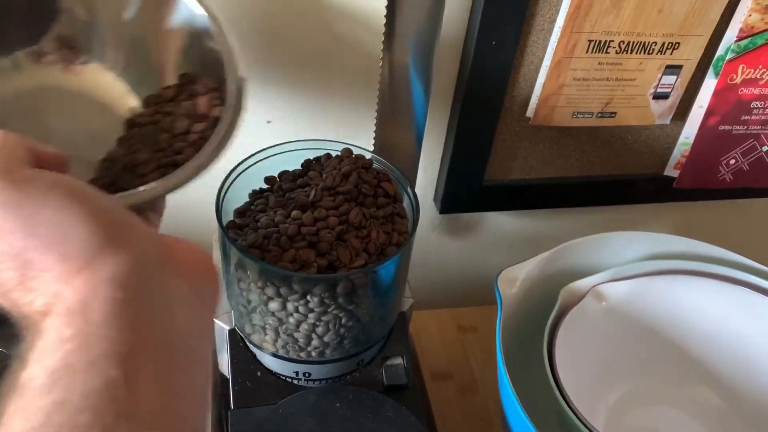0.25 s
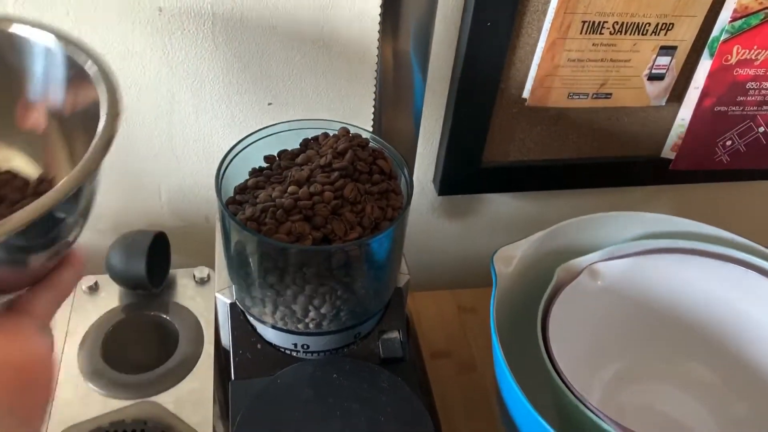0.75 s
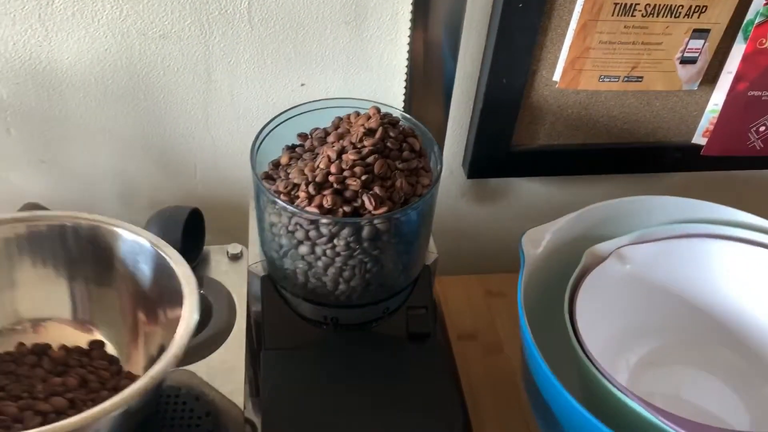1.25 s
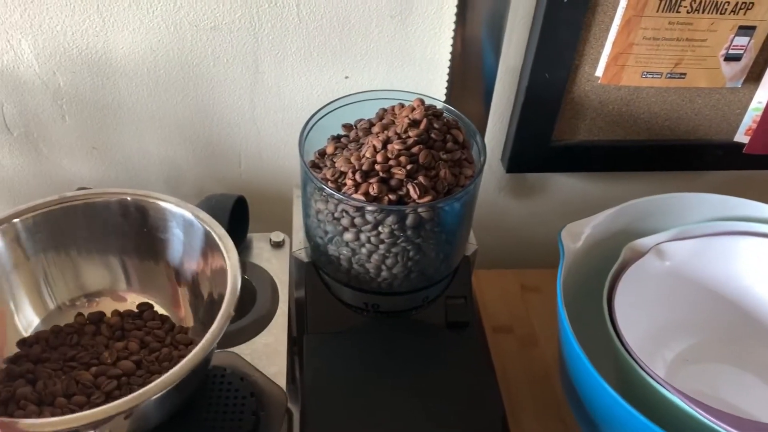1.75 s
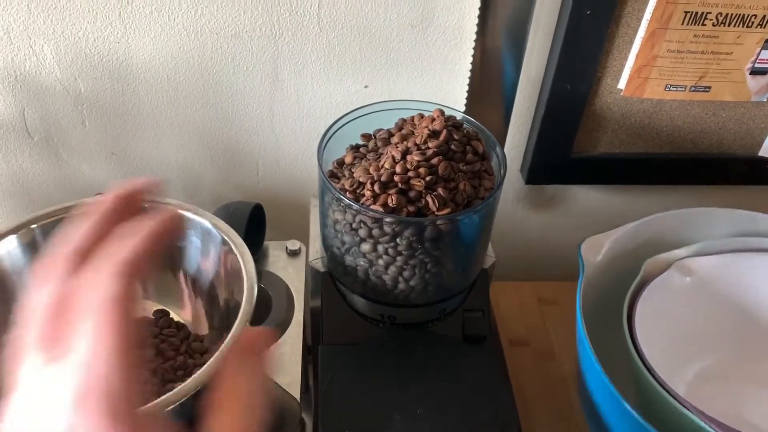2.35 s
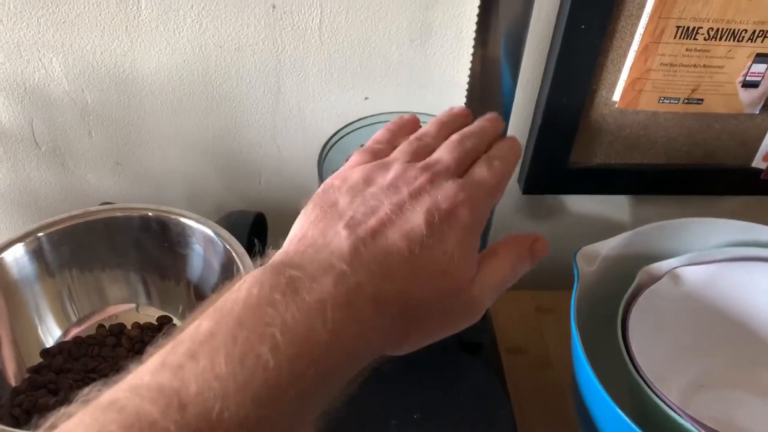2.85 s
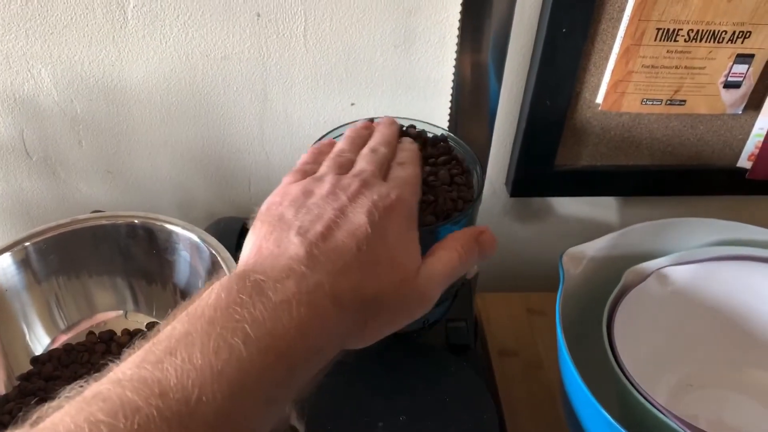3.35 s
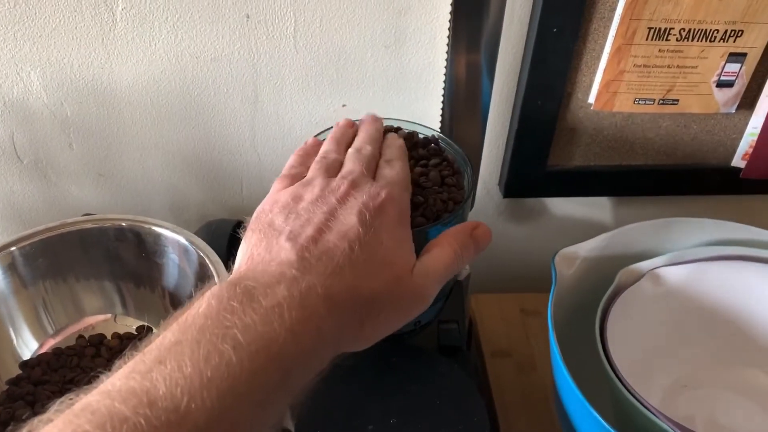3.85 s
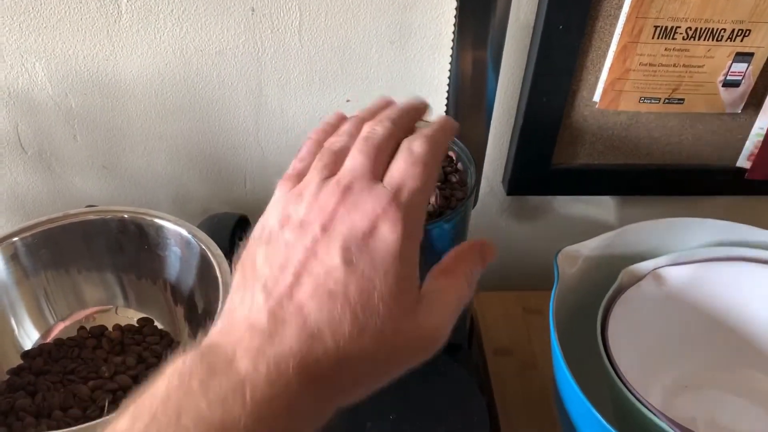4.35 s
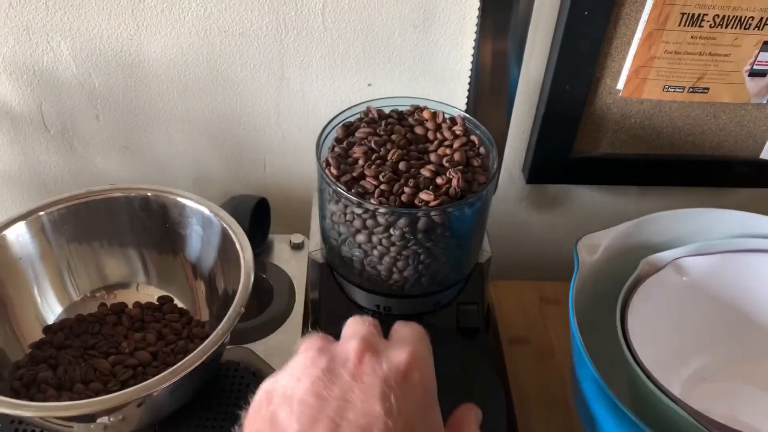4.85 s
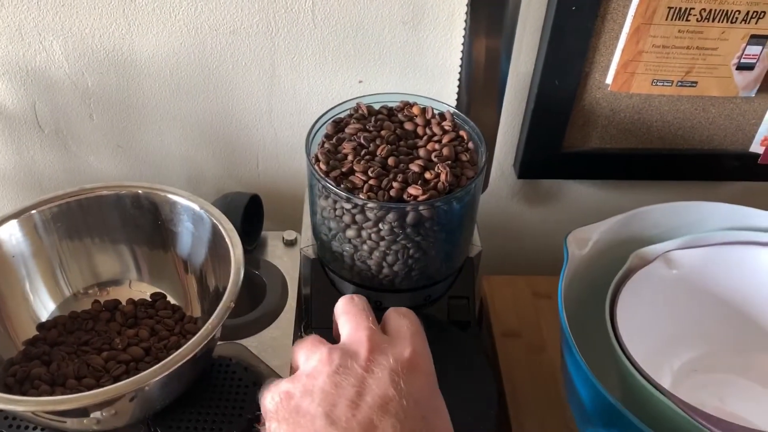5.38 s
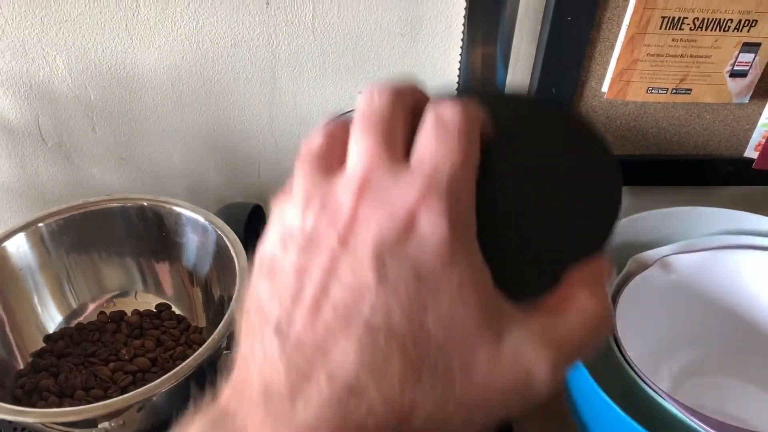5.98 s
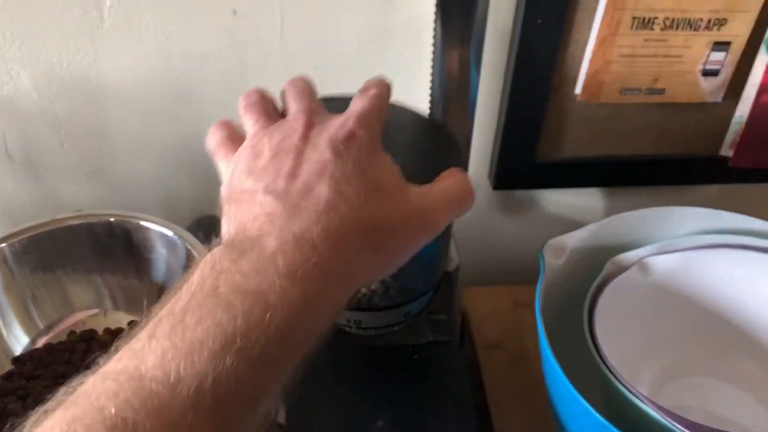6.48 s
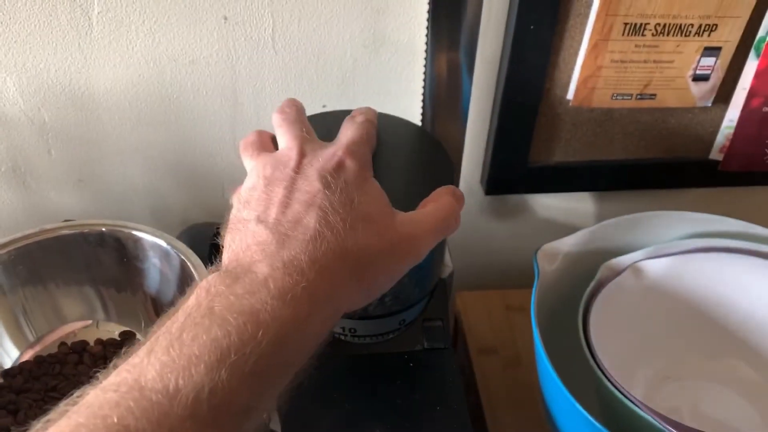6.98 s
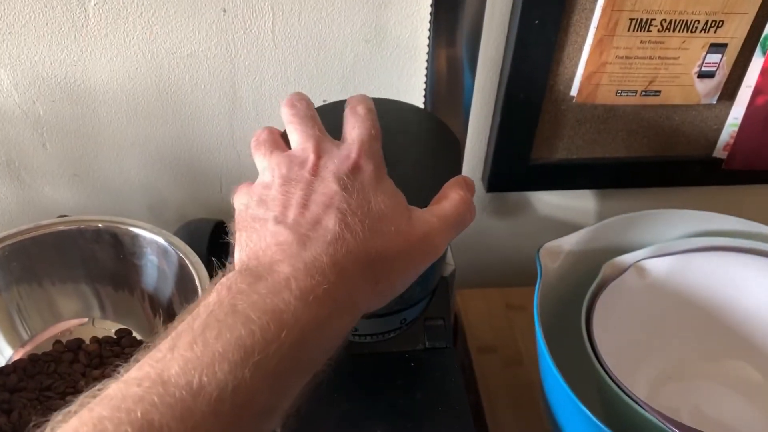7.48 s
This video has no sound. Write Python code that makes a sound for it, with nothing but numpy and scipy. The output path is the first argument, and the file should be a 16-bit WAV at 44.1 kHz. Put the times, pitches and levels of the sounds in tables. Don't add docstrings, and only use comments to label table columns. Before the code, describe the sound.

Close stereo phone microphones catch a bright, dry burst of beans in thin metal, then a loud bowl landing with two bumps. Quiet follows, with low floorboard thumps and distant appliance hum. Beans crunch and tick as they are levelled in a hollow plastic container. Near the end a lid knocks, beans click beneath it, and it seats with a firm closing clack in the small, slightly live kitchen.

```python
import sys
import numpy as np
from scipy import signal
from scipy.fft import rfft, irfft, next_fast_len
from scipy.io import wavfile
from scipy.ndimage import uniform_filter1d

SR = 44100
rng = np.random.default_rng(int(sys.argv[2]) if len(sys.argv) > 2 else 0)


def wav_out(sig):
    wavfile.write(sys.argv[1], SR, np.round(np.clip(np.atleast_2d(sig).T, -1, 1) * 32767).astype(np.int16))


def voltage_ratio(decibels):
    exponent = np.asarray(decibels, float) / 20
    return 10 ** exponent


N = 340447

# peak in seconds, rattle in dB, swell in seconds, settle in seconds.
BOWL_SHIFTS = [
    (0.0, -48.5, 0.0073, 0.048),
    (.03, -72, .01, 0.042),
    (.165, -58.5, 0.014, 0.13),
    (.225, -46.5, .015, 0.041),
    (.89, -71.5, 0.035, 0.13),
    (.97, -68, 0.015, 0.75),
    (1.229, -35, .004, 0.12),
    (1.218, -50, .01, 0.0492),
    (1.275, -36.5, 0.068, 0.043),
    (1.388, -56, 0.011, 0.29),
]
# time in seconds, rattle in dB.
POUR = [(0.049, -69), (.15, -67.5), (.21, -54), (.264, -50), (.33, -45), (.4, -38), (.47, -41), (.53, -53),
        (0.584, -62), (.635, -76)]
# start in seconds, peak in dB, brightness in dB.
BOWL_CLICKS = [(.0074, -37.5, -15), (0.0269, -37, -1.5), (0.072, -55, 2), (0.163, -35.5, 2.5),
               (0.218, -31.5, -4.5), (0.2246, -31.5, 0), (0.2286, -34.5, -3.5), (0.261, -36.5, -6),
               (.272, -34.5, -6), (0.2774, -35, -6), (.2845, -32.5, -3), (0.2954, -22, -1.5),
               (.3015, -31, -2.5), (.327, -31, -3), (.3452, -31, -2.5), (0.3473, -23.5, -2.5),
               (0.361, -31, -3), (.367, -28, -4), (.371, -26.5, -4), (0.382, -28, -3.5),
               (0.3887, -15.5, -2.5), (0.396, -20.5, -4), (0.3985, -24.5, -8), (.413, -22, -4.5),
               (0.409, -21.5, 0), (0.4166, -19, -1), (0.437, -19.5, -1), (0.4603, -15.5, -1),
               (0.47, -24, -1.5), (0.4844, -19, -3), (0.4884, -23.5, -0.5), (0.499, -26.5, -4.5),
               (0.504, -24, -5.5), (.5455, -38, -1.5), (.5695, -34, 0), (.585, -39, -0.5),
               (0.5555, -30.5, -3), (0.5646, -32.5, 2.5), (0.5814, -36.5, 0), (0.889, -59, -1.5),
               (0.9715, -49, -12), (1.2267, -13.5, -3), (1.235, -9.5, -1.5), (1.271, -17.5, -2.5),
               (1.387, -24.5, -3.5)]
# mode in Hz, width in Hz, level in dB.
HELD_WALL = [(3120, 100, 2), (3130, 150, -5), (3640, 120, -8), (4424, 220, -17.5), (8200, 300, 1.5),
             (9590, 66, -4), (10100, 73, -0.5), (10680, 70, -7), (11020, 2000, 5.5), (11350, 59, -6.5),
             (13780, 67, -4.5), (13400, 250, -3), (14200, 300, -4)]
# time in seconds, gain in dB.
HEAP_GAIN = [(.16, 2), (.29, 7), (.42, 2.5), (.5, -4.5), (.6, -1.5)]
# mode in Hz, width in Hz, level in dB.
RESTING_WALL = [(4440, 90, -7.5), (6473, 53, -8), (7560, 120, -3.5), (8040, 69, -2), (9400, 73, -6.5),
                (9750, 42.4, -4), (11000, 39, -7)]


def bowl_beans():
    lands_s = 1.2
    beans = clicks(BOWL_CLICKS)
    t = np.arange(N) / SR
    rush = voltage_ratio(np.interp(t, *np.transpose(POUR), left=-200, right=-200))
    sliding = np.hypot(swells(BOWL_SHIFTS), rush)
    booming = voltage_ratio(-2.5) * sliding ** 1.193 * (t < lands_s)
    slide, body = rattle(sliding, booming, 2 * SR, per_s=2500, spread_db=2.4)
    struck = beans[:, :SR] + slide[:, :SR]
    add(beans, 0, slide + body)
    add(beans, 1, wall(beans[:, SR:2 * SR], RESTING_WALL, -15, damped=3))
    loaded = voltage_ratio(np.interp(t[:SR], *np.transpose(HEAP_GAIN)))
    add(beans, 0, wall(struck * loaded, HELD_WALL[:3], -13))
    add(beans, 0, wall(struck, HELD_WALL[3:], -10))
    return beans


# peak in seconds, rattle in dB, swell in seconds, settle in seconds.
HOPPER_SHIFTS = [(2.906, -63, 0.012, 0.35), (3.15, -57, 0.022, 0.4), (3.22, -54, 0.19, 0.27),
                 (3.07, -70, .15, 0.42), (3.264, -33.5, 0.015, 0.031), (3.29, -39.5, 0.082, 0.15),
                 (3.4, -54, .2, 0.035), (3.52, -84, 0.017, 0.053), (3.688, -54, 0.032, 0.045),
                 (3.766, -71.5, 0.031, 0.057), (3.815, -78, 0.027, 0.026), (3.928, -66, 0.038, 0.075),
                 (4.98, -60, 0.066, 0.074), (6.468, -64, 0.0073, 0.046), (6.488, -36, 0.02, 0.065),
                 (6.705, -59.5, 0.015, 0.2), (6.764, -51, 0.084, 0.038), (6.8, -70, .03, 0.12),
                 (6.882, -46, 0.0063, 0.11), (6.906, -32.5, 0.026, 0.0067), (6.93, -61, .04, 0.13),
                 (7.09, -78.5, 0.091, 0.23), (7.265, -83, 0.23, .02), (7.285, -71, 0.011, 0.092),
                 (7.355, -73, .1, 0.013), (7.01, -60, 0.0081, 0.024), (7.335, -58, 0.13, 0.02),
                 (7.492, -28, 0.014, 0.0084), (7.53, -50.5, 0.046, 0.099), (7.466, -60, .01, 0.056)]
# start in seconds, peak in dB, brightness in dB.
HOPPER_CLICKS = [(2.9065, -60, -8), (2.9094, -60, -7), (3.0837, -50.5, -8), (3.111, -44, -3.5),
                 (3.2212, -36.5, -1), (3.1481, -30.5, -1), (3.2605, -36.5, 3), (3.2638, -15, 0.5),
                 (3.268, -29.5, -3), (3.2825, -27, 0), (3.288, -37.5, -8), (3.3145, -37, -2.5),
                 (3.2995, -23, 0), (3.325, -22.5, -0.5), (3.339, -28.5, -0.5), (3.3812, -30, -8),
                 (3.4078, -28.5, 1), (3.51, -53, -15), (3.524, -53, -9), (3.6531, -54, -6),
                 (3.668, -46.5, -4), (3.8092, -58, 6), (3.689, -29, -2), (3.769, -44, -15),
                 (3.9297, -51.5, -12), (4.954, -50, 2.5), (4.9786, -52, -19), (6.468, -36, -3),
                 (6.4755, -24, -0.5), (6.479, -29, -2), (6.4875, -27, -2.5), (6.4907, -32, -4),
                 (6.754, -28, -2), (6.763, -32, -26), (6.8838, -27.5, -2), (6.889, -29, -2),
                 (6.902, -16, 2), (7.009, -54, 5), (7.232, -47, -2.5), (7.281, -44.5, -8), (7.353, -55, 0),
                 (7.306, -39, -5), (7.471, -43.5, -0.5), (7.4801, -14.5, -0.5), (7.494, -11, -3.5)]
# mode in Hz, width in Hz, level in dB.
OPEN_WALL = [(4014, 80, -10), (5360, 270, -3), (6670, 45, -12.5), (8080, 57, -17), (9580, 90, 2.5),
             (11250, 110, -0.5), (12780, 180, -6)]
# mode in Hz, width in Hz, level in dB.
LIDDED_WALL = [(2420, 24, -12.5), (3674, 27, -8), (4530, 38, -8.5), (6220, 190, -18), (6900, 420, -0.5),
               (9400, 52, -16), (9780, 99, 0.5), (13380, 360, -11.5)]


def hopper_beans():
    lid_on_s = 4.5
    lid_on = round(lid_on_s * SR)
    stirred = swells(HOPPER_SHIFTS)
    drumming = voltage_ratio(-40) * stirred ** 0.51 * (stirred > voltage_ratio(-88))
    grains, body = rattle(stirred, drumming, N, per_s=2000, spread_db=2.6)
    beans = clicks(HOPPER_CLICKS) + grains + body
    add(beans, 2, wall(beans[:, 2 * SR:lid_on], OPEN_WALL, -15, damped=2.5))
    add(beans, lid_on_s, wall(beans[:, lid_on:], LIDDED_WALL, -14, damped=2.5))
    return beans


# frequency in Hz, density in dB per Hz.
BEAN = [(1470, -38), (2500, -15), (2950, -17), (3420, 0), (3790, -10.5), (4030, -5), (4430, -4), (6070, -3),
        (8770, -6.5), (9120, -2.5), (9640, -4.5), (11900, -12), (13100, -5.5), (14400, -18), (14950, -34),
        (15600, -22), (16000, -23.5), (16400, -44.5)]
# frequency in Hz, density in dB per Hz.
HOLLOW = [(350, -82), (600, -17), (705, -17.5), (1190, -18), (1420, -21), (1690, -17), (2040, -17),
          (3200, -29.5), (4160, -43.5), (7040, -120)]


def rattle(level, hollow, length, per_s, spread_db):
    ring_s = 0.0012
    size = voltage_ratio(spread_db * np.minimum(rng.exponential(1, length), 4))
    hits = size * (rng.random(length) < per_s / SR)
    bursts = np.sqrt(signal.lfilter([1], [1, -np.exp(-2 / (ring_s * SR))], hits ** 2))
    grains = evened(bursts * rng.standard_normal((2, length)))
    scratch = colour(grains * voltage_ratio(-4) * level[:length], BEAN)
    return scratch, colour(grains[::-1] * hollow[:length], HOLLOW)


def clicks(table):
    contact_s, rebound, chatter, chatter_db = 0.0006, 4, 20, -15
    t = np.arange(2000) / SR
    u = t / contact_s
    shape = (1 - np.exp(-u)) * (2 * np.exp(-u / rebound) + voltage_ratio(chatter_db) * np.exp(-u / chatter))
    dull, bright = np.zeros((2, 2, N))
    for s, db, bright_db in table:
        noise = rng.standard_normal((3, len(t)))
        uneven = voltage_ratio(2.5 * evened(uniform_filter1d(noise[2], size=30)))
        hz = rng.uniform(6000, 14000, (4, 1))
        rings = voltage_ratio(-13) * np.sin(2 * np.pi * hz * t).sum(0)
        burst = shape * (uneven * noise[:2] + rings)
        onset = burst[:, :len(t) // 16]
        burst = voltage_ratio(db + 2) * burst / np.sqrt(np.mean(onset ** 2))
        share = np.clip(voltage_ratio(bright_db), 0.05, 0.97)
        add(bright, s, share * burst)
        add(dull, s, np.sqrt(1 - share ** 2) * burst)
    return voltage_ratio(-12.5) * colour(band(dull, 900, 9900) + band(bright, 8600, 16000), BEAN)


def wall(struck, modes, db, damped=1):
    return voltage_ratio(db) * sum(voltage_ratio(mode_db) * resonate(struck, hz, damped * width) for hz, width, mode_db in modes)


def shifting(x):
    patchy_db = 2.6
    z = signal.stft(x, nperseg=256)[2]
    patches = uniform_filter1d(rng.standard_normal(z.shape[1:]), size=4, axis=0)
    patches = evened(uniform_filter1d(patches, size=10, axis=1))
    return signal.istft(z * voltage_ratio(patchy_db * patches - 0.16 * patchy_db ** 2), nperseg=256)[1][:, :N]


# start in seconds, peak in dB, pitch in Hz, t60 in seconds.
PINGS = [
    (0.218, -39, 3250, 0.04),
    (3.264, -47, 4000, 0.14),
    (5.408, -62, 3380, 0.06),
    (7.191, -70, 3685, 0.075),
    (7.19, -65, 4510, 0.069),
]


def pings():
    t, out = np.arange(6000) / SR, np.zeros((2, N))
    for s, db, hz, t60 in PINGS:
        ring = voltage_ratio(db - 60 * t / t60) * np.sin(2 * np.pi * hz * t) * (1 - np.exp(-t / 0.0011))
        add(out, s, ring * sides(0))
    return out


# start in seconds, low peak in dB, middle and top in dB relative to it.
BOWL_KNOCKS = [
    (1.2273, -26, -9.5, -11.5),
    (1.2306, -22.5, -12, -15),
    (1.236, -38, -3, 1),
    (1.269, -27, -10.5, -5.5),
    (1.282, -33, -22, -19),
    (1.389, -27, -16.5, -10),
    (1.395, -29.5, -25, -23.5),
    (1.419, -35.5, -11, -17.5),
]
# mode in Hz, level in dB, t60 in seconds.
BOWL = [(193, -5.5, 0.073), (279.4, -2.5, 0.07), (365.4, 4.5, 0.053), (456, 0, 0.046), (518, -9, 0.058),
        (633.6, -7.5, 0.089), (759, -13.5, 0.058), (839.5, -11.5, 0.069), (1131, -16.5, .05),
        (1702, -17.5, 0.036), (2380, -13.5, .04)]


def bowl_knocks():
    rows = [(*row, 1) for row in BOWL_KNOCKS]
    return knocks(rows, BOWL, contact_s=0.0037, push_s=0.0015, clatter_s=0.086)


# start in seconds, low peak in dB, middle and top in dB relative to it, pitch ratio.
LID_KNOCKS = [(4.96, -52.5, 1.5, 0.5, 0.75), (4.979, -41, 3, -20, 0.92), (5.249, -51, -3.5, -7, 1.4),
              (5.408, -48.5, -10, -12, 1.73), (5.701, -43, -23, -36, 0.55), (6.478, -42.5, -5, 2.5, 1.23),
              (6.4915, -31, 5.5, -8, 1.58), (6.504, -31.5, -8.5, -25, 1.15), (6.752, -43, -19, -26, 0.71),
              (6.787, -45, -12.5, -25, 1.53), (6.884, -40.5, -7, -28, 1.08), (6.9015, -29, -19, -37, 1.47),
              (6.905, -36, -21, -38, 0.91), (7.042, -51, 2, -24, 0.897), (7.233, -41.5, -19, -32, 1.35),
              (7.305, -41.5, -24, -13, 1.38), (7.351, -43, -19, -24, 0.96), (7.466, -36, -14, -17, 1.13),
              (7.484, -29, -1, -7, 1.14), (7.49, -18.5, -21, -7, 1.02)]
# mode in Hz, level in dB, t60 in seconds.
LID = [(130.4, -7.5, 0.082), (285, 5.5, 0.045), (448, -13.5, 0.096)]


def lid_knocks():
    return knocks(LID_KNOCKS, LID, contact_s=0.0016, push_s=0.00173, clatter_s=0.05)


def knocks(table, modes, contact_s, push_s, clatter_s):
    t, (out, middle, top) = np.arange(6000) / SR, np.zeros((3, 2, N))
    hz, db, t60 = np.transpose(modes)[:, :, None]
    touch = 1 - np.exp(-t / contact_s)
    push = (1 - np.exp(-t / push_s)) ** 2
    for s, low_db, middle_db, top_db, pitch in table:
        detune = 1 + 0.022 * rng.uniform(-1.22, 1, hz.shape)
        turn = 2 * np.pi * hz * pitch * detune * t
        low = (voltage_ratio(db - 60 * t / t60) * np.sin([turn, turn - hz / 800])).sum(1) * push
        blow = voltage_ratio(low_db) * sides(0.5)
        add(out, s, blow * low / abs(low).max())
        clatter = blow * touch * voltage_ratio(-60 * t / clatter_s) * rng.standard_normal((2, len(t)))
        add(middle, s, voltage_ratio(middle_db) * clatter)
        add(top, s, voltage_ratio(top_db) * clatter)
    return out, voltage_ratio(17.5) * band(middle, 496, 1233) + voltage_ratio(11) * band(top, 1200, 2303)


# peak in seconds, level in dB, swell in seconds, settle in seconds.
BRUSH = [
    (2.302, -73.5, 0.11, 0.17),
    (7.07, -64, 0.038, 0.79),
]
# frequency in Hz, density in dB per Hz.
SKIN = [
    [(880, -41), (1500, -3), (1760, -12), (2350, 3), (3580, -21), (4690, -32), (6230, -3.5), (9000, -36),
     (11700, -42), (19800, -120)],
    [(410, -36), (700, -5), (1010, 2.5), (1290, -15.5), (1610, -9), (2570, -16), (3900, -40.5), (4530, -30),
     (11000, -40), (14300, -64), (22000, -120)],
]


def brush():
    stops_s, lift_s = 7.19, 0.034
    lifted = np.clip((stops_s - np.arange(N) / SR) / lift_s, 0, 1)
    hiss = sum(swells([row]) * colour(rng.standard_normal((2, N)), points) for row, points in zip(BRUSH, SKIN))
    return lifted * hiss


# start in seconds, boom peak in dB, heel thud in dB relative to it, ring t60 in seconds.
FEET = [(0.0, -44, -17, 0.45), (1.085, -47, 4, 0.47), (1.161, -28.5, -12.5, 0.51),
        (1.355, -40.5, -0.5, 0.4), (1.548, -47, -2.5, 0.27), (1.929, -38, -6.5, 0.61),
        (2.182, -32, -1, 0.81), (2.341, -41, -12, 0.25), (2.419, -51, -22, 0.23), (3.065, -40, 3, 0.8),
        (3.093, -32.5, -5, 0.63), (3.17, -36, -7, 0.18), (4.202, -34, -8.5, 0.47),
        (4.389, -44.5, -10.5, 0.56), (4.588, -47.5, -24, 0.72), (4.85, -49.5, -12, 0.38),
        (5.221, -36, -5, 0.71), (5.255, -38.5, -1.5, 0.4), (5.333, -39, -7, 0.45),
        (5.601, -44.5, -10.5, .4), (5.677, -54, 15, 0.61), (6.179, -36.5, -7, 0.76), (6.72, -45, 3, 1),
        (7.067, -46, 6.5, 0.61), (7.197, -44, -7, 0.37), (7.485, -51, 9.5, 0.44)]
# mode in Hz, level in dB, t60 in seconds.
HEEL = [(152, 2.5, 0.3), (199.5, 5, 0.21), (220.7, -6, 0.39), (279.9, -6.5, 0.29)]
BOARD_HZ = (55.46, 68.37)


def feet():
    lower_board_db, rise_s, heel_rise_s = -2.5, 0.0099, 0.03
    t, out = np.arange(28000) / SR, np.zeros((2, N))
    hz, heel_db, heel_t60 = np.transpose(HEEL)[:, :, None]
    for s, db, thud_db, t60 in FEET:
        chance = rng.uniform(-1.6, 1, (len(HEEL), 2))
        sag = t + 0.0022 * np.sin(2 * np.pi * 5 * t + 3 * chance[0, 0])
        board_hz = BOARD_HZ * (1 + 0.066 * chance[:2, 1])
        low, high = np.sin(2 * np.pi * np.outer(board_hz, sag - sag[0]))
        boom = (voltage_ratio(lower_board_db) * low + high) * voltage_ratio(-60 * t / t60) * (1 - np.exp(-t / rise_s))
        turn = 2 * np.pi * hz * (1 + 0.06 * chance[:, :1]) * t + np.pi * chance[:, 1:]
        thud = (voltage_ratio(heel_db - 60 * t / heel_t60) * np.sin(turn)).sum(0) * (1 - np.exp(-t / heel_rise_s))
        boom = boom / abs(boom).max() * sides(-5)
        thud = voltage_ratio(thud_db) * thud / abs(thud).max() * sides(-1.6)
        add(out, s, voltage_ratio(db) * (boom + thud))
    return out + voltage_ratio(-60.5) * ringing(62, 58) * sides(-4.5)


# frequency in Hz, density in dB per Hz.
HUM = [(15, -31.5), (25, 0.5), (60, -4), (134, -1), (176, 0), (320, -10), (376, -6.5), (683, -21.5),
       (1050, -25.5), (1720, -36.5), (8740, -49), (10300, -44.5), (11800, -53.5), (13100, -49),
       (16300, -64.5)]
# frequency in Hz, correlation.
SAME = [(60, 0.94), (180, 0.84), (550, 0.44), (1650, -0.13), (4970, -0.08), (15000, -0.099)]
# pitch in Hz, width in Hz, level in dB.
TONES = [(370, 4.7, -72.5), (186.8, 20, -66.5), (1030, 180, -83)]


def hum():
    hz = np.fft.rfftfreq(2048, 1 / SR)
    a, b, c, d, patches = rng.standard_normal((N // 512 + 5, 1025, 5)).T
    patches = evened(uniform_filter1d(uniform_filter1d(patches, 16, 0), 8, 1))
    same = np.clip(read(SAME, hz), -1, 1)[:, None]
    left = a + 1j * b
    z = np.array([left, same * left + np.sqrt(1 - same ** 2) * (c + 1j * d)])
    z *= voltage_ratio(read(HUM, hz)[:, None] + 1.6 * patches)
    wash = voltage_ratio(-57) * evened(signal.istft(z, nperseg=2048, noverlap=1536)[1][:, :N])
    return wash + sum(voltage_ratio(db) * ringing(f, width) for f, width, db in TONES)


# frequency in Hz, t60 in seconds.
KITCHEN = [(150, .3), (600, 0.2), (2000, 0.21), (6000, 0.16), (14000, 0.011)]


def kitchen(x):
    taps = np.zeros((2, SR // 2))
    starts = np.arange(120, SR // 2 - 20, 20)
    at = starts + rng.integers(0, 20, (2, len(starts)))
    np.put_along_axis(taps, at, rng.choice([-1., 1.], at.shape), 1)
    hz, t, z = signal.stft(taps, SR, nperseg=256)
    tail = signal.istft(z * voltage_ratio(-60 * t / read(KITCHEN, hz)[:, None]), SR, nperseg=256)[1]
    return signal.fftconvolve(x, tail / np.linalg.norm(tail[0]), axes=1)[:, :N]


# frequency in Hz, left lead in radians.
LAG = [(0, 4), (1210, -0.78), (3360, 9.5), (4050, 6), (4740, 18.5), (5430, 16), (6370, 27.5), (8180, 25),
       (11500, 16), (12300, 17), (12900, 16), (13900, 7.5), (14500, 12), (16000, 7)]


def ports(x):
    same = 0.65
    size = next_fast_len(N)
    lead = np.interp(np.fft.rfftfreq(size, 1 / SR), *np.transpose(LAG))
    late = irfft(rfft(x[0], size) * np.exp(-1j * lead), size)[:N]
    return np.array([x[0], same * late + np.sqrt(1 - same ** 2) * x[1]])


def swells(rows):
    swell_db = 30
    power = np.full(N, 1e-20)
    for s, db, swell_s, settle_s in rows:
        first = max(round((s - 2 * swell_s) * SR), 0)
        i = np.arange(first, min(round((s + 2 * settle_s) * SR), N))
        t = i / SR - s
        power[i] += voltage_ratio(db - swell_db * np.maximum(-t / swell_s, t / settle_s)) ** 2
    return np.sqrt(power)


def resonate(x, hz, width):
    r = np.exp(-np.pi * width / SR)
    poles = [1, -2 * r * np.cos(2 * np.pi * hz / SR), r * r]
    return np.sqrt((1 - r * r) / 2) * signal.lfilter([1, 0, -1], poles, x)


def ringing(hz, width):
    return evened(resonate(resonate(rng.standard_normal(N), hz, width), hz, width))


def colour(x, points):
    hz = abs(np.fft.fftfreq(2048, 1 / SR))
    log_gain = np.log(voltage_ratio(np.maximum(read(points, hz), -70)))
    taps = np.fft.ifft(np.exp(np.conj(signal.hilbert(log_gain)))).real[:1024]
    return signal.oaconvolve(x, taps[None] / np.linalg.norm(taps), axes=1)[:, :x.shape[1]]


def band(x, lo_hz, hi_hz):
    return signal.sosfilt(signal.butter(2, [lo_hz, hi_hz], "band", fs=SR, output="sos"), x)


def evened(x):
    return x / np.sqrt(np.mean(x ** 2) + 1e-20)


def read(points, hz):
    f, value = np.transpose(points)
    return np.interp(np.log(hz + 1), np.log(f + 1), value)


def sides(pan_db):
    return voltage_ratio(np.array([[pan_db / 2], [-pan_db / 2]]))


def add(mix, s, sound):
    part = mix[:, round(s * SR):][:, :sound.shape[1]]
    part += sound[:, :part.shape[1]]


def scene():
    beans = shifting(bowl_beans() + hopper_beans()) + pings()
    bowl_low, bowl_clatter = bowl_knocks()
    lid_low, lid_clatter = lid_knocks()
    near = ports(beans + bowl_clatter + lid_clatter)
    low = bowl_low + lid_low
    wet = voltage_ratio(-9.5) * near + voltage_ratio(-13) * low
    return near + low + kitchen(wet) + brush() + feet() + hum()


def roll_off(x):
    return signal.sosfilt(signal.butter(12, 16470, fs=SR, output="sos"), x)


def record(dry):
    cut = signal.sosfilt(signal.butter(3, 38, "high", fs=SR, output="sos"), dry)
    dipped = signal.lfilter(*signal.iirnotch(11900, 14, SR), cut)
    peaked = dipped + 6 * signal.lfilter(*signal.iirpeak(15600, 18, SR), dipped)
    edge = signal.firwin(255, 16500, fs=SR)
    return roll_off(signal.oaconvolve(peaked, edge[None], "same", axes=1))


dry = scene()
out = record(dry)
wav_out(out)
```